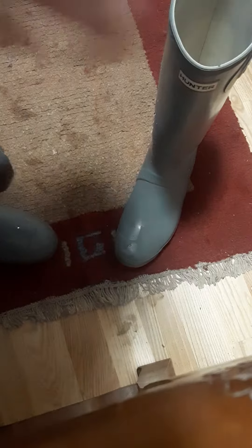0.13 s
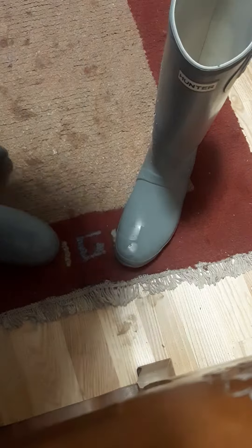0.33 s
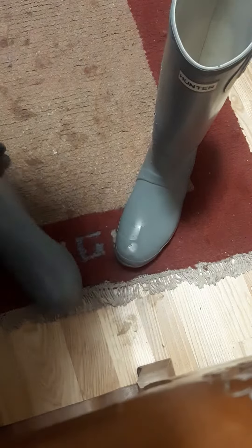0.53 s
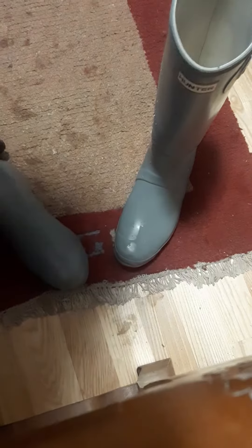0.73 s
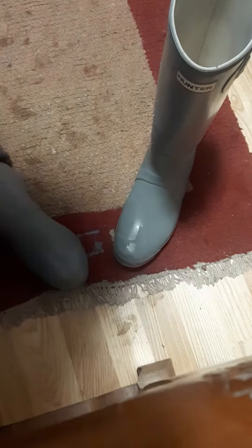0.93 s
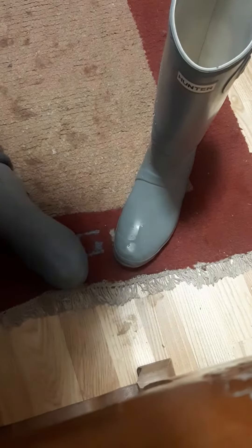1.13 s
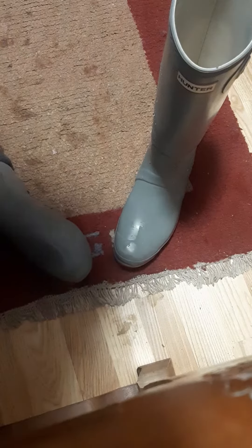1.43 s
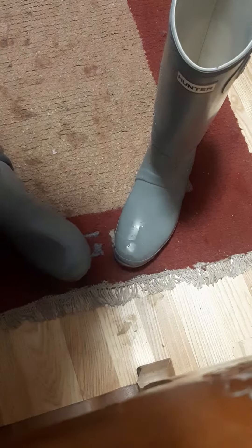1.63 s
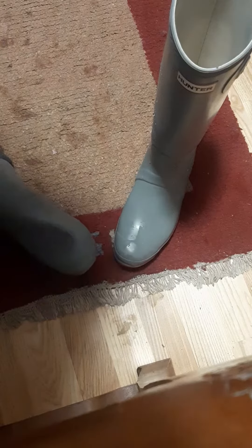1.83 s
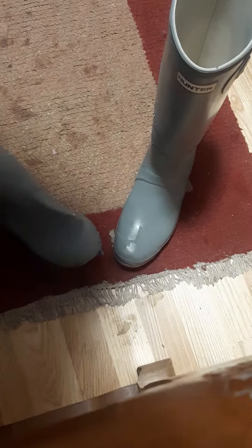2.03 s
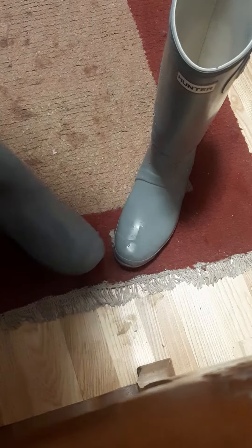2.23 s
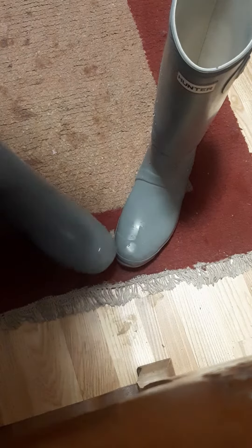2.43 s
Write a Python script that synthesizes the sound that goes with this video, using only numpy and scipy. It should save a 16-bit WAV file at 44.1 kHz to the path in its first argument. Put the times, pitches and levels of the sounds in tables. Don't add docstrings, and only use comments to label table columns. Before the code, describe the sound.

Tall rubber boots move on a rug, close to a phone's two unlike microphones: soft drag, rubbery slap, five quick groaning creaks, two soft thumps, then firmer brushing strokes, with a short indoor room answer.

```python
import sys
import numpy as np
from scipy import signal
from scipy.io import wavfile
from scipy.ndimage import uniform_filter1d

SR = 44100
rng = np.random.default_rng(int(sys.argv[2]) if len(sys.argv) > 2 else 0)


def boost(x):
    u = np.asarray(x, float) / 20
    return 10 ** u


def store_wav(level_fs):
    pcm = np.round(np.clip(np.atleast_2d(level_fs), -1, 1) * 32767)
    wavfile.write(sys.argv[1], SR, pcm.T.astype(np.int16))


N = 114660
T = np.arange(N) / SR


def rms_one(x):
    return x / np.sqrt(np.mean(x ** 2) + 1e-20)


def filtered(x, order, hz, kind="low"):
    return signal.sosfilt(signal.butter(order, hz, kind, fs=SR, output="sos"), x)


def delayed(x, lag_s):
    return np.interp(T - lag_s, T, x)


def clicks_at(s, db):
    out = np.zeros(N)
    out[(np.asarray(s) * SR).astype(int)] = boost(db)
    return out


def ring(clicks, hz, t60):
    r, w = boost(-60 / (t60 * SR)), 2 * np.pi * hz / SR
    return signal.lfilter([0, np.sin(w)], [1, -2 * r * np.cos(w), r * r], clicks + 1e-18)


def drift(rate_hz):
    r = np.exp(-80 * np.pi * rate_hz / SR)
    slow = signal.lfilter([1], [1, -2 * r, r * r], rng.standard_normal(N // 40 + 2002))[2000:]
    return np.interp(np.arange(N) / 40, np.arange(len(slow)), rms_one(slow))


def at_hz(points, hz):
    f, value = np.transpose(points)
    return np.interp(np.log(hz), np.log(f), value)


# f/Hz, likeness/1
MICROPHONE_LIKENESS = [(60, 0.8), (250, 0.63), (600, 0.27), (2000, 0.075), (12000, 0.065)]


def two_sided(mid, side, hz):
    alike = np.clip(at_hz(MICROPHONE_LIKENESS, hz), -1, 1)
    return np.sqrt(1 + alike) * mid + np.sqrt(1 - alike) * side * [[1], [-1]]


def friction(spectrum, per_s, spread_db, patchy_db):
    out, together = 0, drift(9)
    edges = 22 * 2 ** np.arange(0, 9.6, .5)
    sizes = boost(spread_db * np.minimum(rng.exponential(1, (2, 2, N)), 4))
    grains = sizes * rng.standard_normal((2, 2, N)) * (rng.random((2, 2, N)) < per_s / SR) + 1e-18
    for k, (low, high) in enumerate(zip(edges, edges[1:])):
        mid, side = filtered(grains[k % 2], 2, [low, high], "band")
        hz = np.sqrt(low * high)
        gain = boost(at_hz(spectrum, hz) + patchy_db * (0.29 * together + drift(22.6)))
        out = out + gain * two_sided(mid, side, hz)
    return rms_one(out)


def swells(rows):
    out = 0
    for start, full, end, first_db, second_db in rows:
        shape = np.sin(np.pi / 2 * np.interp(T, [start, full, end], [0, 1, 0])) ** 2
        out = out + shape * boost([[first_db], [second_db]])
    return out


# f/Hz, level/dB per Hz
ROOM_TONE_COLOUR = [(15, -32), (25, 5), (482, -11.5), (666, -1), (762, -43.5), (848, -5), (1200, -27.5),
                    (2560, -10.5), (15500, -20)]


def room_tone():
    return boost(-64) * friction(ROOM_TONE_COLOUR, SR, spread_db=0, patchy_db=.5)


# f/Hz, level/dB per Hz
RUMBLE_COLOUR = [(35, -48), (60, -21), (264, -14), (372, -12.5), (449, -1), (595, -4), (1830, -14.5),
                 (2500, -14), (3250, -21), (5500, -120)]


def rug_rumble():
    return friction(RUMBLE_COLOUR, 1600, spread_db=0.0, patchy_db=1.5)


# f/Hz, level/dB per Hz
FIBRE_COLOUR = [(530, -4), (900, -13), (1820, -13.5), (2510, -30), (3180, -4), (7060, -6), (8650, -19.5),
                (11500, -5), (15500, -13.5)]
# start t/s, fullest t/s, end t/s, fibre hiss level/dB, body rumble level/dB
STROKES = [
    (.0, .19, 0.35, -66, -69),
    (0.52, .68, .78, -58.5, -99),
    (1.07, 1.37, 1.64, -65, -68),
    (1.6, 1.8, 2.03, -59, -62),
    (1.85, 1.977, 2.15, -52, -55),
    (1.95, 2.25, 2.652, -56.5, -60.5),
    (2.3, 2.616, 2.9, -52.5, -57),
    (2.56, 2.605, 2.65, -76, -66),
]
# f/Hz, level/dB, t60/s
BOOT_MODES = [(121, -13.5, 0.3), (225, -20, 0.42), (239, 4.5, 0.07), (289, 8, 0.045), (373, -16.5, 0.24),
              (534, -11, 0.3), (617, -11, 0.034), (700, -18.5, 0.18), (829, -0.5, 0.064)]


def dragging(rumble):
    hiss, weight = swells(STROKES)
    hum = rms_one(sum(boost(db) * ring(rumble, hz, t60) for hz, db, t60 in BOOT_MODES[4:]))
    fibres = friction(FIBRE_COLOUR, 6000, spread_db=1.5, patchy_db=.5)
    return hiss * fibres + weight * (rumble + boost(-10.5) * hum)


# t/s, level/dB
SCRUB = [
    (0.2, -53),
    (0.206, -72),
    (0.214, -36.5),
    (0.248, -34.5),
    (0.37, -60),
    (0.466, -67),
    (0.5, -88),
]
# f/Hz, level/dB per Hz
SCRUB_COLOUR = [(50, -4.5), (200, 9), (580, 6.5), (1370, 1), (2300, 3), (6000, 4), (8700, -16),
                (15500, -6.5)]


def scrubbing():
    bloom_hz, bloom_lag_s, scuff_low_db = 517, .014, -30
    scuff_s, scuff_db, scuff_rise_s, scuff_t60_s = 0.68, -43.5, 0.025, 0.36
    s, db = np.transpose(SCRUB)
    slap_gain = boost(np.interp(T, s, db, -120, -120) + 1)
    since = np.maximum(T - scuff_s, 0)
    scuff_gain = boost(scuff_db - 60 * since / scuff_t60_s) * (1 - np.exp(-(since / scuff_rise_s) ** 2))
    grains = friction(SCRUB_COLOUR, 6000, spread_db=2.5, patchy_db=1.0)
    low = filtered(grains, 2, bloom_hz)
    high = filtered(grains, 2, bloom_hz, "high")
    late = delayed(slap_gain + boost(scuff_low_db) * scuff_gain, bloom_lag_s)
    return high * (slap_gain + scuff_gain) - low * uniform_filter1d(late, size=441)


# t/s, peak level/dB
SLAP = [
    (.2165, -45),
]


def slap():
    s, db = np.transpose(SLAP)
    return ring(clicks_at(s, db + 18.5), 2350, 0.012) + ring(clicks_at(s, db + 3), 616, 0.054)


# start t/s, fullest t/s, end t/s, level/dB, deep share level/dB
PRESSES = [
    (0.684, .73, 0.85, -80, 12.5),
    (0.88, 1.015, 1.26, -59.5, 8),
    (1.3, 1.494, 1.564, -67, -6),
    (1.78, 1.997, 2.12, -54.5, -18),
]


def groan(rumble):
    level, deep = swells([(a, b, c, db, db + deep_db) for a, b, c, db, deep_db in PRESSES])
    shaft = sum(boost(db) * ring(rumble, hz, t60) for hz, db, t60 in BOOT_MODES[1:5])
    floor = ring(rumble, 121, 0.068) + boost(-6.0) * ring(rumble, 143, 0.043)
    return level * rms_one(shaft) + deep * rms_one(floor)


# f/Hz, level/dB, t60/s
CRACK_MODES = [(3300, 7, .0042), (5100, 0, .002), (6800, 3, .0026)]


def blows(rows, push_hz, push_t60, boot_db, soft_hz, direct_db):
    boot_lag_s = 0.00221
    s, db, crack_db = np.transpose(rows)
    snap_db = db + crack_db
    chance_db = rng.normal(0, 3.5, (len(s), len(BOOT_MODES)))
    crack = sum(ring(clicks_at(s, snap_db + level), hz, t60) for hz, level, t60 in CRACK_MODES)
    flap = ring(clicks_at(s, snap_db + 10.5), 1213, 0.0029)
    push = -ring(ring(clicks_at(s, db - 16), push_hz, push_t60), push_hz, push_t60)
    boot = 0
    for k, (hz, level, t60) in enumerate(BOOT_MODES):
        boot = boot - ring(clicks_at(s + boot_lag_s, db + boot_db + level + chance_db[:, k]), hz, t60)
    body = filtered(push + boot, 4, soft_hz)
    body = filtered(body, 2, 109, "high")
    near = boost(direct_db) * (crack + boost(-7) * flap) + body
    far = clicks_at(s, snap_db + 27) + flap + body
    return np.array([near, far])


# t/s, peak level/dB, crack re push level/dB
SLIPS = [
    (.8992, -32, -11),
    (.9312, -26, -10),
    (.9597, -25.5, -10.5),
    (1.0017, -25, -10),
    (1.0555, -25.5, -10),
]


def creaks():
    return blows(SLIPS, push_hz=708, push_t60=.0036, boot_db=-18, soft_hz=1900, direct_db=1)


# t/s, peak level/dB, crack re push level/dB
KNOCKS = [
    (1.6308, -24.5, -18.5),
    (1.7116, -24.5, -18.5),
]


def knocks():
    return blows(KNOCKS, push_hz=634, push_t60=.006, boot_db=-13, soft_hz=980, direct_db=-9)


# centre f/Hz, level/dB, t60/s
ROOM_BANDS = [(159.5, -6, 0.44), (420, -6.5, 0.31), (983, -3.5, 0.3), (2200, -3, 0.21), (4450, -7, 0.45),
              (8300, -45, 0.32), (13000, -35, 0.27)]


def room(x):
    rise_s = 0.0058
    t, out = np.arange(SR // 2) / SR, 0
    for hz, level_db, t60 in ROOM_BANDS:
        mid, side = filtered(rng.standard_normal((2, SR // 2)), 2, [hz / 1.5, hz * 1.5], "band")
        shape = (1 - np.exp(-(t / rise_s) ** 2)) * boost(-60 * t / t60)
        shape = shape / np.sqrt(np.sum(shape ** 2))
        out = out + boost(level_db) * shape * two_sided(mid, side, hz)
    return signal.fftconvolve(x[None], out, axes=1)[:, :N]


def scene():
    tone = room_tone()
    rumble = rug_rumble()
    drag = dragging(rumble) + groan(rumble)
    scrub, clack = scrubbing(), slap()
    near, far = creaks() + knocks()
    left = near + boost(6) * clack
    right = boost(-5.5) * delayed(near, .00037) + clack
    wet = room(far + clack + boost(-9) * scrub[0])
    side_gain = boost(3.5 * (T < .5) * [[-1], [1]])
    return np.array([left, right]) + wet + drag * side_gain + scrub * boost([[0], [3]]) + tone


def band_limit(x):
    return signal.sosfilt(signal.butter(12, 16370, fs=SR, output="sos"), x)


def record(dry):
    peak_hz, peak_width_hz, peak_db = 2400, 766, 12.5
    left, right = filtered(dry, 2, 70, "high")
    r, w = np.exp(-np.pi * peak_width_hz / SR), 2 * np.pi * peak_hz / SR
    honk = signal.lfilter(np.array([1, 0, -1]) * (1 - r * r) / 2, [1, -2 * r * np.cos(w), r * r], right)
    full = right + boost(peak_db) * honk
    dull = filtered(full, 8, 6400)
    right = boost(-3) * (dull + boost(-11.5) * (full - dull))
    top_cut = signal.cheby2(16, 40, 15900, fs=SR, output="sos")
    mix = signal.sosfilt(top_cut, np.array([left, right]))
    return band_limit(mix)


dry = scene()
out = record(dry)
store_wav(out)
```